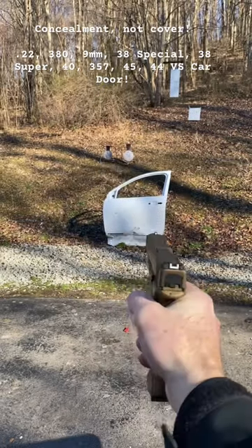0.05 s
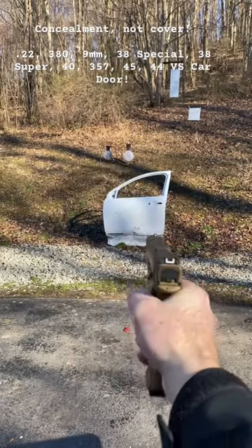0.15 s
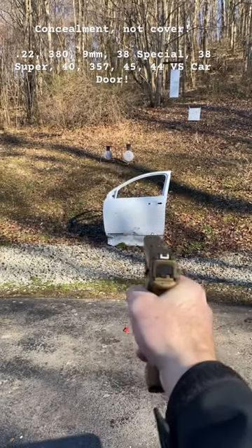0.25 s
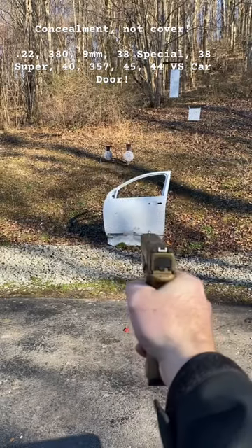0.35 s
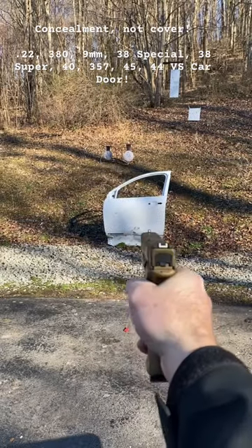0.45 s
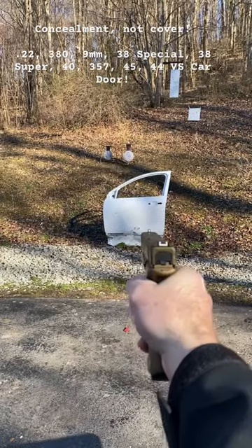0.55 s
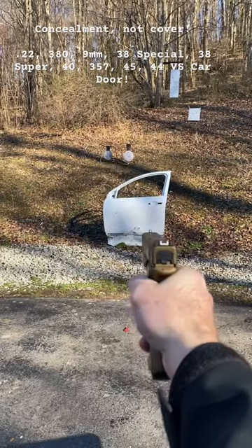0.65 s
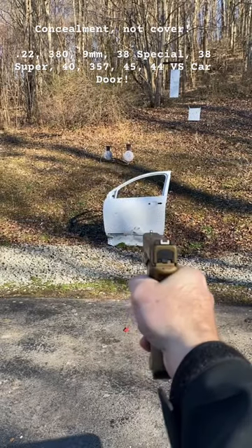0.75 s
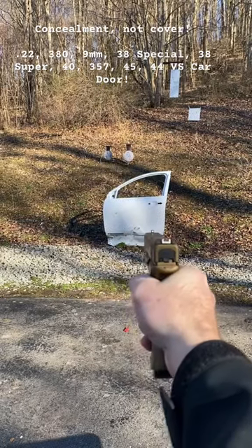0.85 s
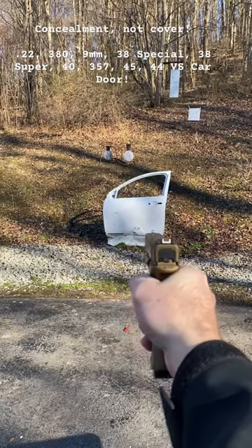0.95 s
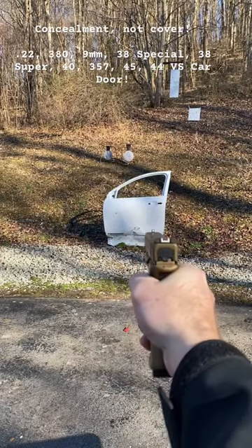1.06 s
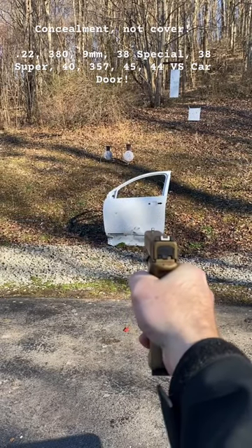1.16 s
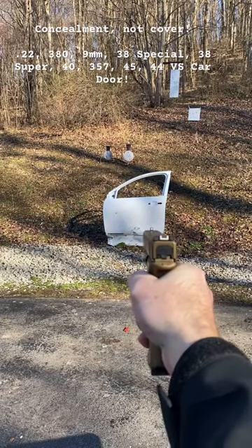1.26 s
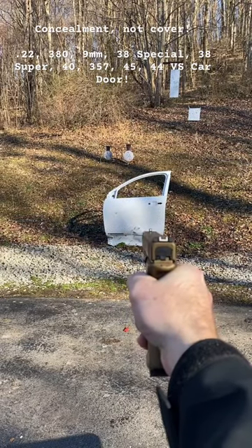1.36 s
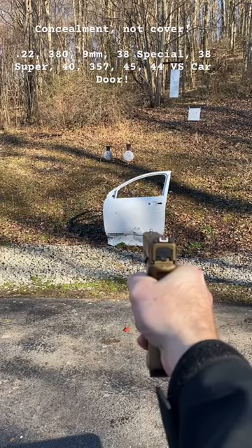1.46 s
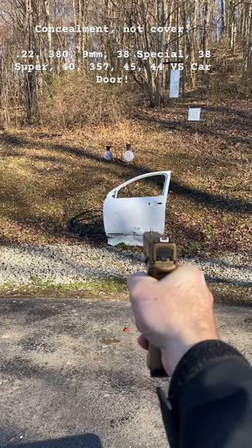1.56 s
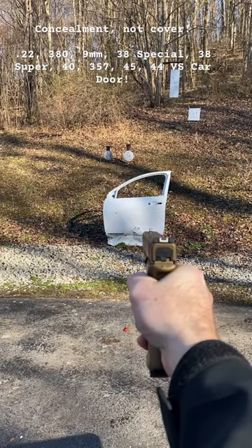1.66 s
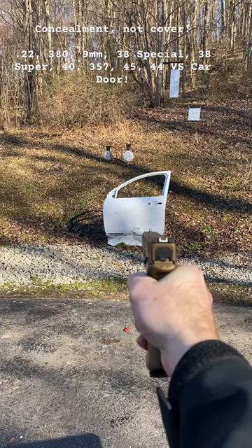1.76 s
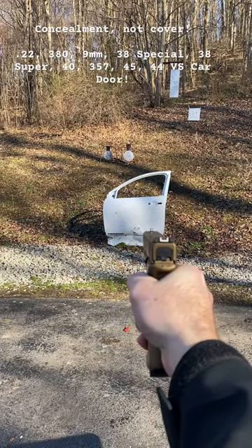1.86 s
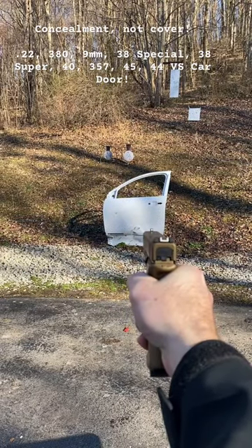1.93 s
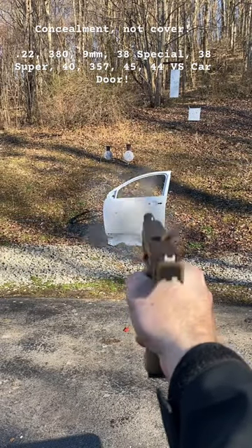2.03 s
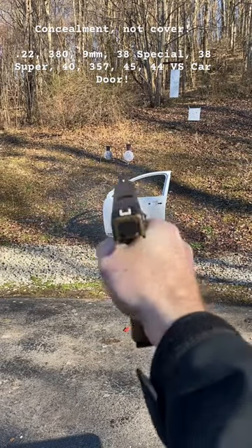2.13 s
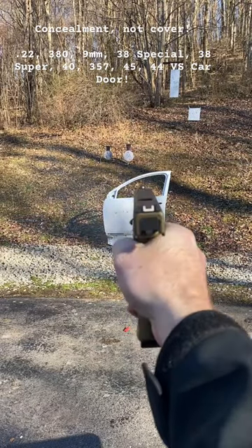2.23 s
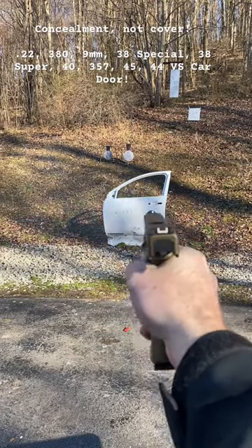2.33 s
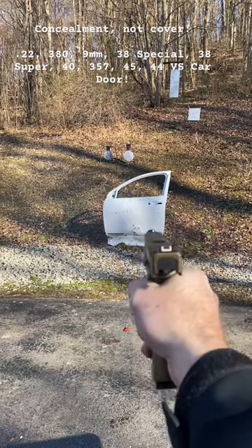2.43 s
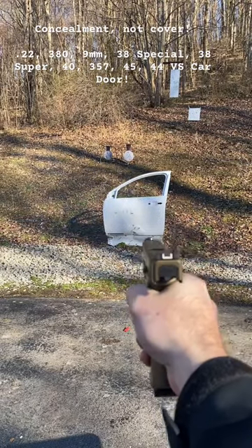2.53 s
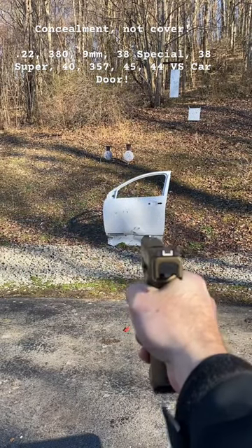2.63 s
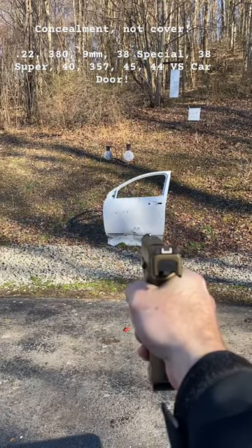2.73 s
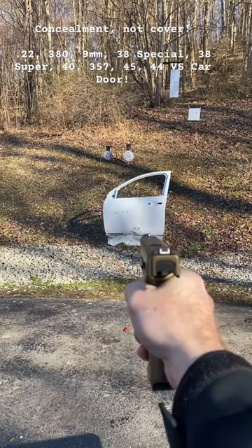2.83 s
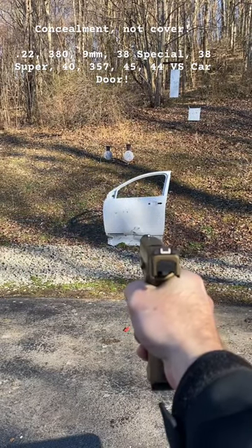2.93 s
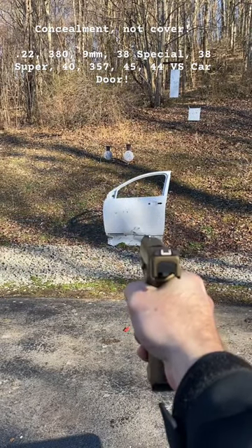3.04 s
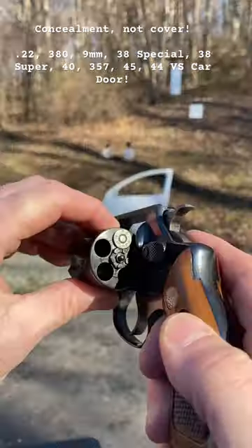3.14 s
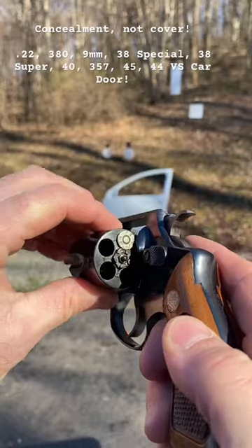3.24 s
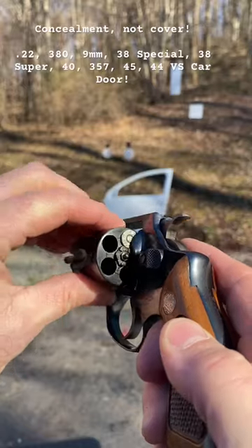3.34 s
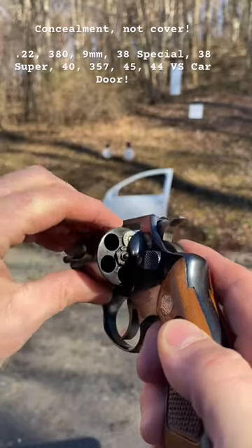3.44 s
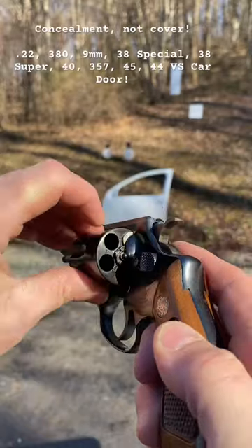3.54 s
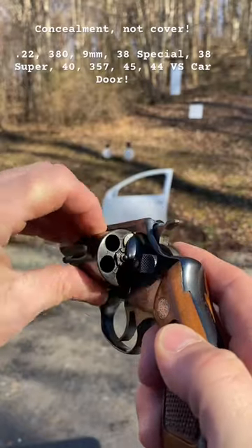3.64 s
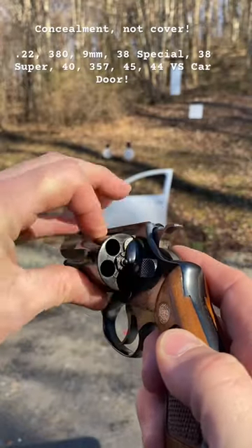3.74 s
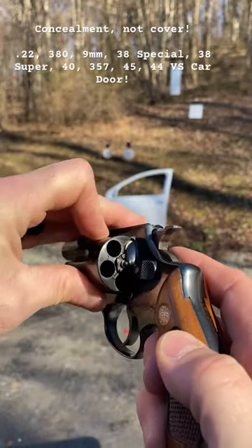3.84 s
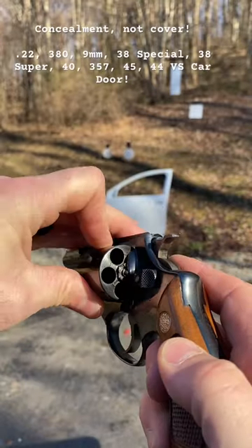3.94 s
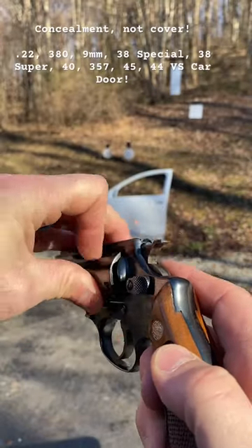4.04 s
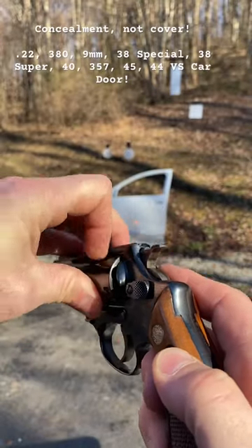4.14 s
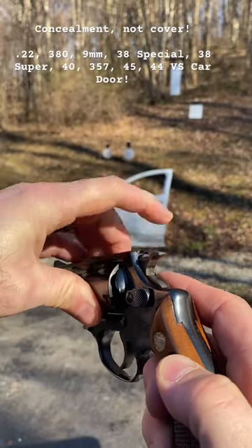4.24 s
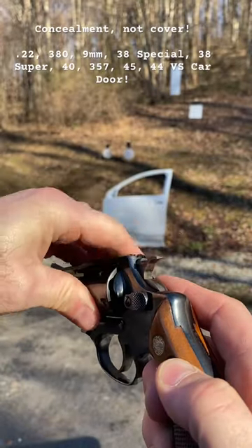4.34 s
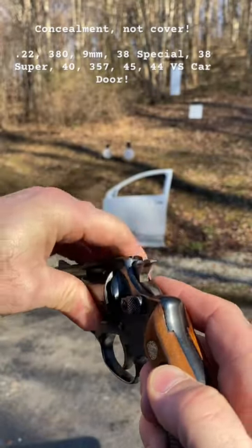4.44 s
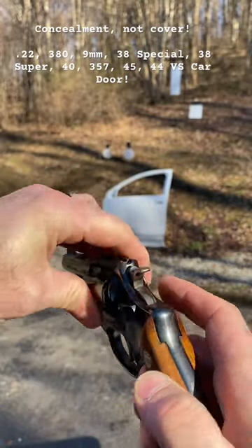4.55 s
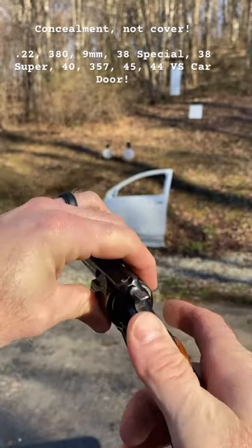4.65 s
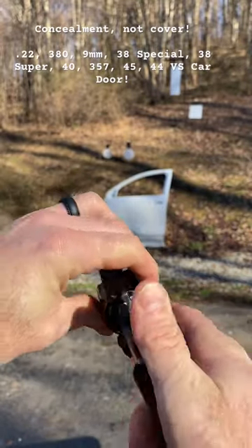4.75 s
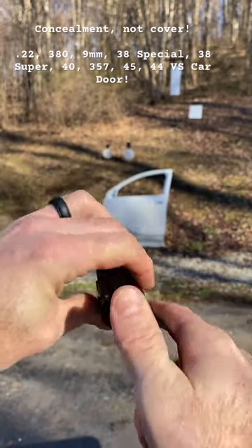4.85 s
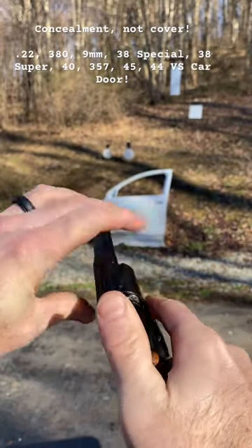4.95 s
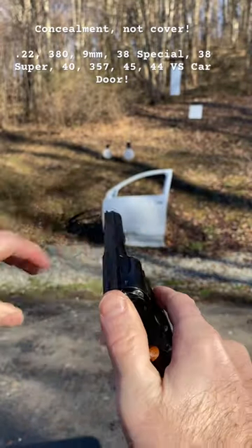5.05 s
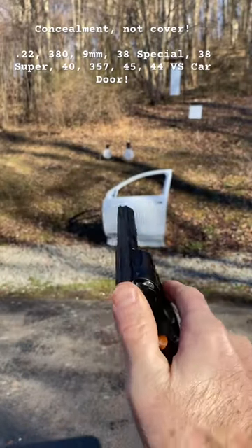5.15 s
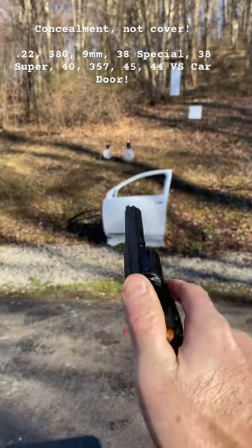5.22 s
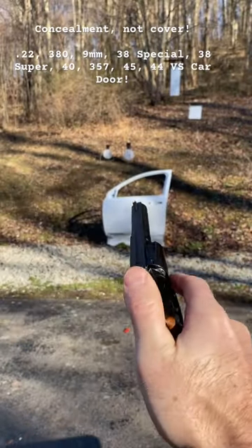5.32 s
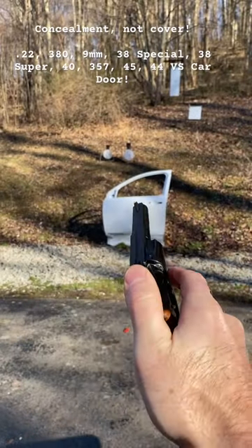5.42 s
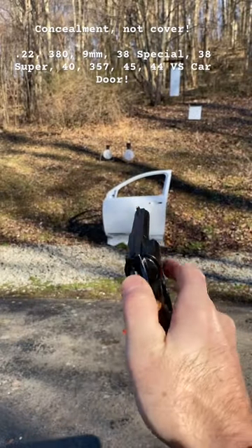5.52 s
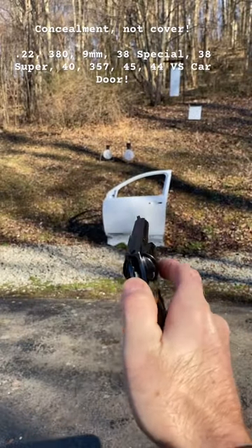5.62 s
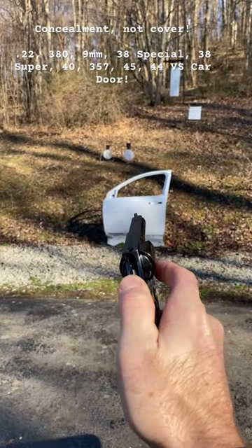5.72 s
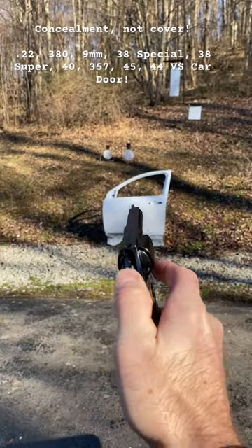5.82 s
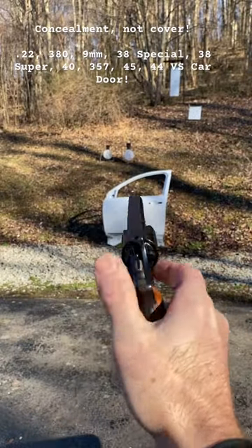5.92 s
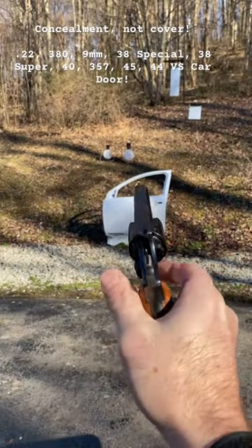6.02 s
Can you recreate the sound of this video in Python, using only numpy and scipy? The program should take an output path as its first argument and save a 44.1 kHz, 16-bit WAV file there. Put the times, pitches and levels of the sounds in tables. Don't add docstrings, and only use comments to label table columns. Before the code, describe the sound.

Quiet outdoor background at a wood's edge, heard in stereo by a close phone: soft low traffic rumble, airy hiss, a little breeze in leaves until 0.5 s, faint high bird peeps around 0.8, 1.0 and 1.9 s, and a weak low engine drone near 1.1-2.0 s. At 2.02 s a pistol fires, very loud: a gas burst, short low boom and hard crack, with a second crack at 2.06 s. Tree echo dips then swells to about 2.35 s, fading and dulling until an abrupt cut at 3.13 s. Background turns slightly brighter, with rustling leaves. A small revolver click comes at 3.44 s, a bird chirp at 3.8 s, then a very loud bright cylinder clack at 3.97 s. Light ticks and cloth brushing follow. Cocking clicks run 5.44-5.53 s, strongest at 5.52 s. A rough grip rub at 5.84 s and small knocks end it as traffic rises slightly.

```python
import sys
import numpy as np
from scipy import signal
from scipy.fft import rfft, irfft, next_fast_len
from scipy.io import wavfile
from scipy.ndimage import uniform_filter1d

SR = 44100
rng = np.random.default_rng(int(sys.argv[2]) if len(sys.argv) > 2 else 0)


def boost(x):
    u = np.asarray(x, float) / 20
    return 10 ** u


def pcm_store(signal):
    levels = np.round(np.clip(np.atleast_2d(signal), -1, 1) * 32767)
    wavfile.write(sys.argv[1], SR, levels.astype(np.int16).T)


N = 268113
T = np.arange(N) / SR
SCENE_CHANGE_S = 3.129

# [f/Hz, level/dB per Hz]
RUMBLE_COLOUR = [(12, -55), (20, -25), (24, -17.5), (34, -10.5), (65, 1), (128, -4.5), (166, -16.5),
                 (193, -18), (400, -26.5), (520, -50.5), (880, -120)]
HISS_COLOUR = [(120, -33.5), (200, -5), (448, -7.5), (623, -6), (683, -8.5), (791, -9), (1270, -9.5),
               (2170, -12), (8900, -34.5), (16000, -47)]
LEAF_COLOUR = [(1500, -29.5), (2500, 3), (7500, -0.5), (10500, -7.5), (12500, -12), (14000, -33),
               (16500, -45)]
# [f/Hz, likeness/0-1]
OPEN_LIKENESS = [(60, 0.8), (130, 0.98), (290, 0.6), (640, 0.1), (1410, 0.1), (3100, 0.4), (6820, 0.08),
                 (15000, 0.2)]
# [low f/Hz, high f/Hz]
EMPTY_BANDS = [(8400, 9600), (12600, 13900)]
# [rumble level/dB, hiss level/dB, leaf level/dB]
BED_BEFORE, BED_AFTER = (-59, -67, -105), (-57.5, -63.5, -77)
# [t/s, level/dB, swell/s]
TRAFFIC_PASSES = [(0.0, -57.5, .4), (1.1, -63, .3), (3.7, -61, .4), (5.4, -63, .4), (6.08, -54.5, .1)]
BREEZE_DB, BREEZE_ENDS_S, BREEZE_SAG_DB_S, BREEZE_DIES_DB_S = -71.5, 0.49, 15.5, 130
BREEZE_GROWS_DB_S = 1.73
SHOT_S, SHOT_DUCK_DB, SHOT_DUCK_S = 2.02, -5, 0.56
CLACK_S, CLACK_DUCK_DB, CLACK_RECOVERS_S = 3.99, -4, 0.1906
# [t/s, level/dB, hold/s]
DRONE_SWELLS = [(1.12, -56, 0.024), (1.26, -55.5, 0.062), (1.83, -56.5, .17)]
DRONE_HZ, DRONE_RISE_DB_S, DRONE_FALL_DB_S = 128, 158, 45
# [t/s, level/dB, f/Hz, length/s]
CHIRPS = [
    (0.776, -76, 6800, .02),
    (1.015, -78, 7840, 0.025),
    (1.9, -79.5, 7410, 0.018),
    (3.805, -64, 7900, 0.05),
    (5.246, -77, 7720, .03),
]

# [f/Hz, level/dB per Hz]
ECHO_COLOUR = [(35, -54), (60, -27), (200, -11.5), (330, -3.5), (700, -0.5), (1200, -5), (2500, -13),
               (6400, -26), (8200, -34.5), (11000, -42.5), (16000, -64.5)]
# [f/Hz, likeness/0-1]
ECHO_LIKENESS = [(60, 0.94), (130, 0.94), (290, 0.92), (640, 0.6), (1410, 0), (3100, 0.3), (6820, 0.18),
                 (15000, 0.42)]
NEAR_S, NEAR_DB, NEAR_RISE_DB_S, NEAR_FALL_DB_S = 2.068, -27, 900, 241.5
FAR_S, FAR_DB, FAR_RISE_DB_S, FAR_HOLD_S, FAR_FALL_DB_S = 2.3385, -28, 61.5, 0.049, 28
TREBLE_DB, TREBLE_LOSS_DB_S = -7, 17.5
LUMPS_DB, LUMPS_PER_S = 0.75, 55

# [t/s, level/dB, hold/s]
SLEEVE_MOVES = [(2.72, -78, 0.43), (3.3, -79.5, 0.14), (3.751, -86, 0.058), (3.921, -76, 0.24),
                (4.449, -75, 0.21), (4.821, -75.5, 0.21), (5.55, -77, 0.089), (5.83, -73, 0.055),
                (5.999, -75, .08)]
SLEEVE_EDGE_DB_S = 420
# [f/Hz, level/dB per Hz]
CLOTH_COLOUR = [(2000, -19.5), (4000, 1.5), (7500, -4.5), (11000, -4.5), (14500, -8), (15700, -2),
                (16000, -42)]
# [t/s, level/dB, rise/dB per s, fall/dB per s, hold/s]
RUBS = [
    (5.842, -41, 1000, 699, 0),
    (5.826, -57.5, 1200, 1400.5, 0.053),
    (6.015, -62, 1199, 600, .03),
]
# [f/Hz, width/Hz, level/dB]
GRIP_RESONANCES = [(1470, 270, -6), (2220, 320, -1.5), (2750, 250, 4), (4400, 490, 0), (6500, 550, -2),
                   (10500, 2500, -36)]
# [t/s, level/dB, f/Hz, t60/s]
THUDS = [(3.966, -30.5, 530, 0.014), (3.968, -32.5, 230, .03), (5.9, -46, 130, .05),
         (6.0105, -39.5, 414, 0.018), (4.49, -56, 3450, 0.021), (4.509, -56, 3450, 0.02),
         (3.125, -50, 51, 0.063), (3.97, -58, 3690, .15)]
# [f/Hz, level/dB, t60/s]
CYLINDER_MODES = [(2700, 1.5, 0.017), (3044, -3.5, 0.0283), (3660, -36.5, .14), (3950, -4.5, 0.015),
                  (5710, -7, .014), (6752, -4, 0.023), (7220, -24.5, .04), (10380, 5, 0.0071),
                  (11740, 3.5, .008), (14650, 6.5, 0.0057)]
HAMMER_MODES = [(2560, -5, 0.011), (3475, -4.5, 0.014), (4100, -11, 0.021), (4760, -17, 0.025),
                (4910, -32, 0.044), (5400, 2.5, 0.0066), (6220, -8, 0.026), (6800, -26, 0.024),
                (7800, -5, 0.0048), (11000, 0.5, 0.0062)]
FRAME_HZ, FRAME_T60_S = 1470, .017
# [t/s, peak level/dB, f/Hz, frame level/dB]
TURNING = [
    (3.4177, -46.5, 4520, -51),
    (3.441, -28.5, 5660, -36),
]
CLOSING = [(3.9409, -18, 4764, -30), (3.9459, -29, 3790, -35), (3.95, -21, 9017, -54.5),
           (3.9627, -19.5, 7910, -34.5), (3.9648, -1.5, 5510, -35), (3.9666, 0.5, 11010, -28.5),
           (3.9698, -19, 5218, -39.5)]
COCKING = [(5.4369, -28, 7230, -63), (5.4475, -33.5, 5930, -56), (5.461, -33, 9010, -70),
           (5.4657, -24, 6530, -62), (5.474, -43, 6050, -67), (5.4996, -16, 5230, -40),
           (5.5012, -15.5, 5180, -47), (5.509, -30.5, 4610, -49), (5.5216, -3.5, 5400, -38),
           (5.525, -19.5, 7500, -46), (5.5296, -26.5, 4910, -51)]
# [t/s, peak level/dB, f/Hz]
TICKS = [(4.102, -52.5, 7030), (4.122, -44.5, 8810), (4.498, -47.5, 6000), (4.828, -45.5, 5910),
         (5.727, -51.5, 4910), (5.818, -48, 3710), (5.8427, -33, 2700), (5.8757, -43, 2960),
         (6.043, -48, 4770)]
SLIDES = [(2.99, -47.5, 5240), (3.121, -41, 9000), (3.957, -31.5, 4740), (3.974, -37, 5380),
          (5.489, -38, 6600), (5.515, -33, 5300), (5.533, -57, 5240)]
HIT_T60_S, TICK_T60_S, SLIDE_T60_S = .0075, 0.0087, 0.032
LIGHT_KNOCK_DB, STEEL_PAN_DB, PAN_SPREAD_DB, STEEL_LOW_HZ = -20, -.5, 2.5, 810

# [f/Hz, level/dB per Hz]
RUSH_COLOUR = [(300, -7.5), (600, 5.5), (1630, -12), (1840, -9), (3720, -7.5), (4040, -3.5), (4600, -19),
               (5890, -5.5), (7700, -18), (8600, -60), (22000, -120)]
RUSH_OPENS_S, RUSH_OPEN_DB_S, RUSH_PAN_DB_OCTAVE = 2.0115, 9000, -1.5
RUSH_PEAK_S, RUSH_DB, RUSH_RISE_DB_S, RUSH_FALL_DB_S = 2.018, -7, 3600, 1299.5
RUSH_TAIL_DB, RUSH_TAIL_DB_S = -16.5, 329.5
BOOM_HZ, BOOM_CREST_S = 282, 2.0226
BOOM_S, BOOM_DB, BOOM_HOLD_S, BOOM_RISE_DB_S, BOOM_FALL_DB_S = 2.013, -11.5, .019, 3499.5, 1500
# [t/s, peak level/dB, length/s, crackle level/dB, crackle t60/s]
FRONTS = [(2.025, 0.92, 0.0026, -1, .015), (2.025, -1.04, 0.0028, -31, .02),
          (2.0305, -6, .0006, -15.5, 0.024), (2.034, -22, .0004, -17.5, 0.088),
          (2.0591, 0, 0.00044, -0.5, .022), (2.06, -10.5, 0.0011, -15, 0.11),
          (2.1632, -15.5, 0.0005, -27, .025), (2.245, -17, 0.00063, -42, .03),
          (2.287, -14.5, 0.00063, -33, .03)]
FRONT_PAN_DB, ECHO_PAN_DB = -1, 1.06


def on_log(table, hz):
    f, v = np.transpose(table)
    return np.interp(np.log(np.maximum(hz, 1)), np.log(f), v)


def unit(x):
    return x / np.sqrt(np.mean(x ** 2))


def panned(db):
    return boost(np.array([[db], [-db]]) / 2)


def walk(rate, size=N):
    k = int(SR / rate)
    steps = np.repeat(rng.standard_normal(size // k + 1), k)
    return 1.35 * uniform_filter1d(uniform_filter1d(steps, k), k)[:size]


def swell(s, db, rise_db_s, fall_db_s, hold=0.):
    return boost(db - rise_db_s * np.maximum(s - T, 0) - fall_db_s * np.maximum(T - s - hold, 0))


def bands(size, colour, likeness):
    n = next_fast_len(size)
    hz = np.arange(n // 2 + 1) * SR / n
    mid, side = rfft(rng.standard_normal((2, n)))
    c = np.clip(on_log(likeness, hz), -1, 1)
    spread = np.sqrt(1 - c) * side * np.array([[1], [-1]])
    pair = boost(on_log(colour, hz)) * (np.sqrt(1 + c) * mid + spread)
    for low, high in EMPTY_BANDS:
        pair = pair * ((hz < low) | (hz > high))
    pair = pair / np.sqrt(np.mean(irfft(pair, n) ** 2))
    octave = np.log2(np.maximum(hz, 1) / 16)
    lowest, highest = (int(np.log2(f / 16)) for f in (colour[0][0], colour[-1][0]))
    split = []
    for k in range(lowest, highest + 2):
        weight = np.clip(1 - abs(octave - k), 0, 1)
        split.append((16 * 2 ** k, irfft(pair * weight, n)[:, :size]))
    return split


def resonate(x, hz, width):
    return signal.lfilter(*signal.iirpeak(min(hz, .45 * SR), max(hz / width, .2), fs=SR), x)


def add(out, s, x):
    i = int(s * SR)
    out[:, i:i + x.shape[-1]] += x[..., :N - i]


def bed_gains():
    rumble, hiss, leaves = (boost(np.where(T < SCENE_CHANGE_S, a, b)) for a, b in zip(BED_BEFORE, BED_AFTER))
    for s, db, length in TRAFFIC_PASSES:
        rumble = rumble + swell(s, db, 12 / length, 12 / length)
    breeze = swell(BREEZE_ENDS_S, BREEZE_DB, 0, BREEZE_DIES_DB_S) * boost(-BREEZE_SAG_DB_S * T)
    leaves = leaves * boost(BREEZE_GROWS_DB_S * np.maximum(T - SCENE_CHANGE_S, 0)) + breeze
    duck_db = SHOT_DUCK_DB * np.clip((T - SHOT_S) / SHOT_DUCK_S, 0, 1) * (T < SCENE_CHANGE_S)
    dip = (T > CLACK_S) * np.exp(-((T - CLACK_S) / CLACK_RECOVERS_S) ** 2)
    return np.array([rumble, hiss, leaves]) * boost(duck_db + CLACK_DUCK_DB * dip)


def rumble_hiss_leaves():
    out = np.zeros((2, N))
    colours = (RUMBLE_COLOUR, HISS_COLOUR, LEAF_COLOUR)
    flickers_db, rates = (1.3, .9, 2.4), (5, 9, 13)
    for gain, colour, flicker_db, rate in zip(bed_gains(), colours, flickers_db, rates):
        for _, band in bands(N, colour, OPEN_LIKENESS):
            out += gain * boost(flicker_db * walk(rate)) * band
    return out


def engine_drone():
    swells = [swell(s, db, DRONE_RISE_DB_S, DRONE_FALL_DB_S, hold) for s, db, hold in DRONE_SWELLS]
    gain = np.max(swells, axis=0) * (T < SHOT_S)
    return np.sqrt(2) * gain * boost(1.5 * walk(12)) * np.sin(2 * np.pi * DRONE_HZ * T)


def birds():
    out = np.zeros((2, N))
    for s, db, hz, length in CHIRPS:
        t = np.arange(int(length * SR)) / SR
        whistle = np.sin(2 * np.pi * hz * t * (1 - 0.029 * t / length))
        add(out, s, boost(db) * np.hanning(len(t)) * whistle)
    return out


def wood_echo():
    out = np.zeros((2, N))
    span = slice(int(2.062 * SR), int(SCENE_CHANGE_S * SR))
    size = span.stop - span.start
    near = swell(NEAR_S, NEAR_DB, NEAR_RISE_DB_S, NEAR_FALL_DB_S)
    far = swell(FAR_S, FAR_DB, FAR_RISE_DB_S, FAR_FALL_DB_S, FAR_HOLD_S)
    treble_db = TREBLE_DB - TREBLE_LOSS_DB_S * (T[span] - NEAR_S)
    for hz, band in bands(size, ECHO_COLOUR, ECHO_LIKENESS):
        tilt_db = np.clip((hz - 700) / 3300, 0, 3.5) * (treble_db + 12.0)
        out[:, span] += band * boost(.8 * walk(45, size) + tilt_db)
    out[:, span] *= boost(LUMPS_DB * walk(LUMPS_PER_S, size)) * (near + far)[span] * panned(ECHO_PAN_DB)
    return out


def sleeve():
    moves = sum(swell(s, db, SLEEVE_EDGE_DB_S, SLEEVE_EDGE_DB_S, hold) for s, db, hold in SLEEVE_MOVES)
    cloth = sum(band for _, band in bands(N, CLOTH_COLOUR, OPEN_LIKENESS))
    return moves * boost(2.5 * walk(30)) * cloth


def grip_rub():
    slips = rng.standard_normal((2, N)) * boost(3.5 * walk(500))
    slips = slips[0] + .5 * slips
    skin = 0
    for hz, width, db in GRIP_RESONANCES:
        skin = skin + boost(db) * resonate(resonate(slips, hz, width), hz, 2 * width)
    return unit(skin) * sum(swell(*row) for row in RUBS) * panned(-5.5)


def thuds():
    out = np.zeros((2, N))
    t = np.arange(int(.12 * SR)) / SR
    for s, db, hz, t60 in THUDS:
        add(out, s, boost(db - 60 * t / t60) * np.sin(2 * np.pi * hz * t))
    return out


def contacts():
    rows = [row + (HIT_T60_S,) for row in TURNING + CLOSING + COCKING]
    for table, t60 in ((TICKS, TICK_T60_S), (SLIDES, SLIDE_T60_S)):
        rows += [(s, db, hz, db + LIGHT_KNOCK_DB, t60) for s, db, hz in table]
    return rows


def gun_steel():
    out = np.zeros((2, N))
    t = np.arange(int(.12 * SR)) / SR
    thin = signal.butter(3, STEEL_LOW_HZ, "high", fs=SR, output="sos")
    for s, db, hz, frame_db, t60 in contacts():
        chance = rng.standard_normal((3, len(t)))
        pan_db = STEEL_PAN_DB + PAN_SPREAD_DB * chance[1, 0]
        attack = 1 - np.exp(-t / 0.00033)
        burst = (chance[0] + 0.56 * chance[1:]) * boost(-80 * t / max(t60, .002)) * attack
        edge = .45 * (0.00666 / t60) * (hz / 7000) ** 2.1
        body = resonate(resonate(burst, hz, hz), hz, min(2.056 * hz, .4 * SR))
        crack = body + edge * np.diff(burst, prepend=0)
        ring = np.zeros(len(t))
        for f, mode_db, mode_t60 in CYLINDER_MODES if s < 5 else HAMMER_MODES:
            decay = boost(mode_db - 5.5 * abs(np.log2(f / hz)) - 60 * t / mode_t60)
            ring += decay * np.sin(2 * np.pi * f * t + rng.uniform(0, 2 * np.pi))
        hit = crack / abs(crack).max() + 0.62 * ring / abs(ring).max()
        frame_hz = FRAME_HZ * (1 + 0.023 * chance[0, 0])
        frame = boost(frame_db - 60 * t / FRAME_T60_S) * np.sin(2 * np.pi * frame_hz * t)
        knock = boost(db) * hit / abs(hit).max() + frame
        add(out, s, signal.sosfilt(thin, knock) * panned(pan_db))
    return out


def rush_and_boom():
    out = np.zeros((2, N))
    first, size = int(2.0 * SR), int(.12 * SR)
    span = slice(first, first + size)
    rush = swell(RUSH_PEAK_S, RUSH_DB, RUSH_RISE_DB_S, RUSH_FALL_DB_S)
    rush = rush + swell(RUSH_PEAK_S, RUSH_TAIL_DB, RUSH_RISE_DB_S, RUSH_TAIL_DB_S)
    rush = rush * swell(RUSH_OPENS_S, 0, RUSH_OPEN_DB_S, 0)
    rush_noise = np.zeros((2, size))
    for hz, band in bands(size, RUSH_COLOUR, [(600, 0.11), (5000, 0.11), (7000, 1.0)]):
        rush_noise += band * panned(RUSH_PAN_DB_OCTAVE * np.log2(hz / 700))
    ring = swell(BOOM_S, BOOM_DB, BOOM_RISE_DB_S, BOOM_FALL_DB_S, BOOM_HOLD_S)
    phase = 2 * np.pi * BOOM_HZ * (T[span] - BOOM_CREST_S) + 0.81 * walk(150, size)
    boom = np.sqrt(2) * np.cos(phase) * np.array([[1], [0.043]])
    out[:, span] = rush[span] * rush_noise + ring[span] * boom
    return out


def pressure_fronts():
    out = np.zeros((2, N))
    t = np.arange(int(.15 * SR)) / SR
    for s, db, length, crackle_db, t60 in FRONTS:
        front = boost(db) * (1 - t / length) * np.exp(-t / length)
        rush = rng.standard_normal((3, len(t)))
        crackle = 0.47 * (0.17 * rush[0] + rush[1:]) * boost(crackle_db - 60 * t / t60)
        top_hz = min(16000 / (1 + 30 * max(s - FRONTS[0][0], 0)), .45 * SR)
        dull = signal.butter(2, top_hz, fs=SR, output="sos")
        add(out, s, signal.sosfilt(dull, front + crackle) * panned(FRONT_PAN_DB))
    return out


def scene():
    outdoors = rumble_hiss_leaves() + engine_drone() + birds()
    revolver = sleeve() + grip_rub() + thuds() + gun_steel()
    shot = rush_and_boom() + pressure_fronts()
    return outdoors + wood_echo() + revolver + shot


def low_pass(x):
    return signal.sosfilt(signal.butter(12, 16980, fs=SR, output="sos"), x)


def record(dry):
    n = next_fast_len(N + SR // 4)
    hz = np.arange(n // 2 + 1) * SR / n
    response = np.exp(-2j * np.pi * 2.8 * np.log(1 + hz / 250)) * hz / (hz + 9)
    for low, high in EMPTY_BANDS:
        response = response * (1 - .7 * np.exp(-((hz - (low + high) / 2) / (high - low) * 2) ** 4))
    x = irfft(rfft(dry, n) * response, n)[:, :N]
    x = .95 * np.tanh(x / .95)
    x = signal.sosfilt(signal.ellip(8, .2, 70, 16500, fs=SR, output="sos"), x)
    mix = np.array([x[0], np.roll(x[1], 1)])
    return low_pass(mix)


dry = scene()
out = record(dry)
pcm_store(out)
```